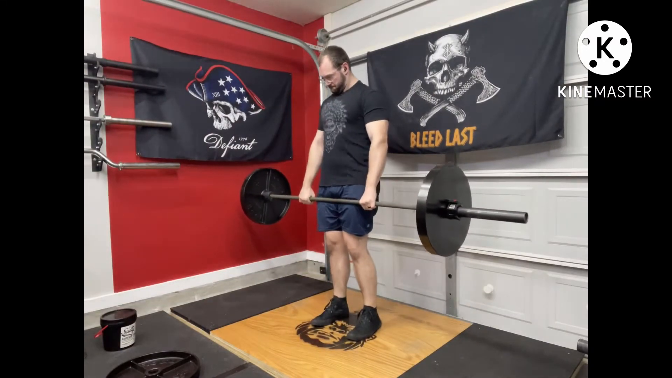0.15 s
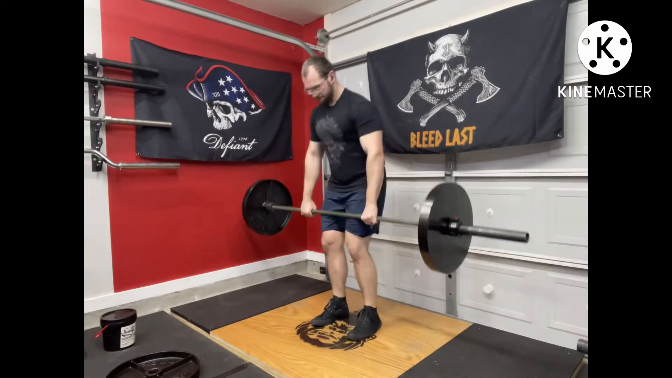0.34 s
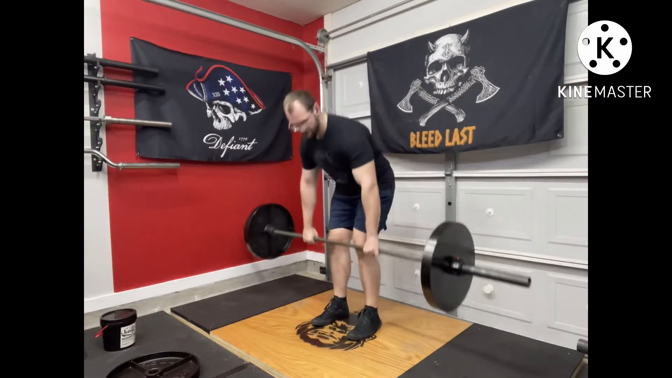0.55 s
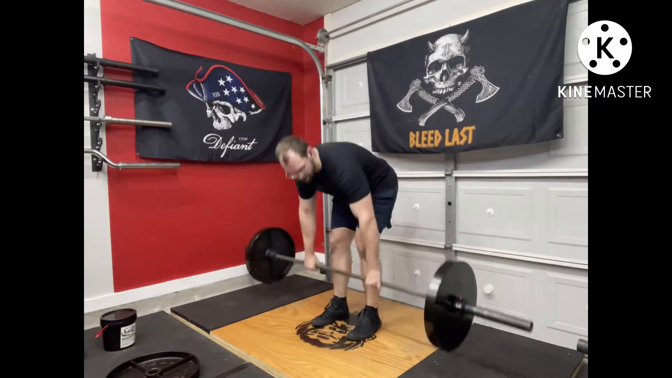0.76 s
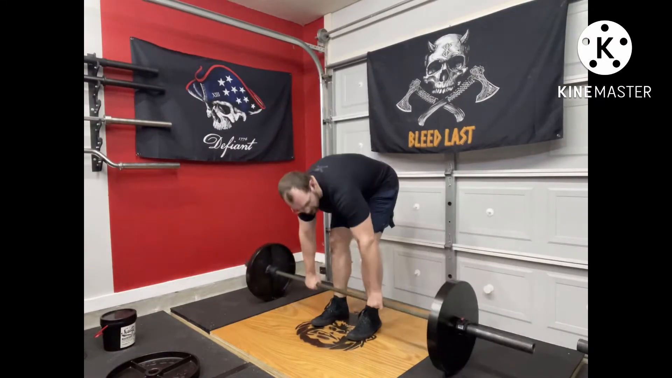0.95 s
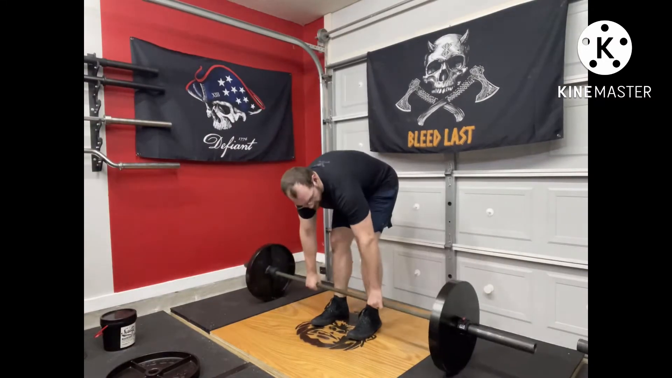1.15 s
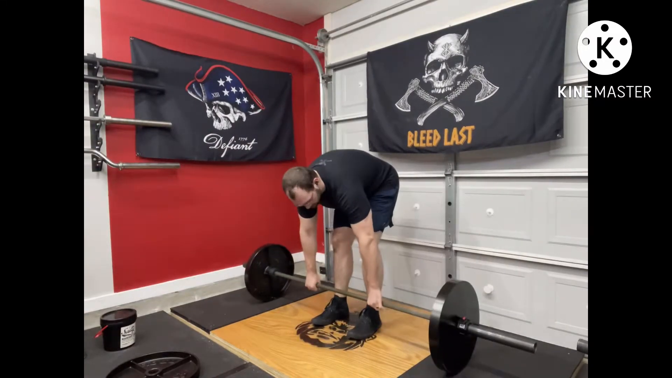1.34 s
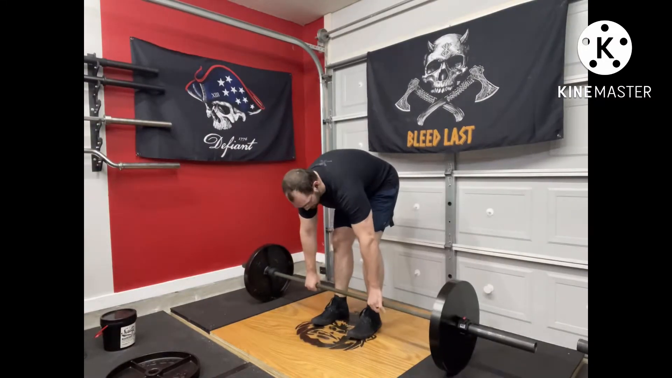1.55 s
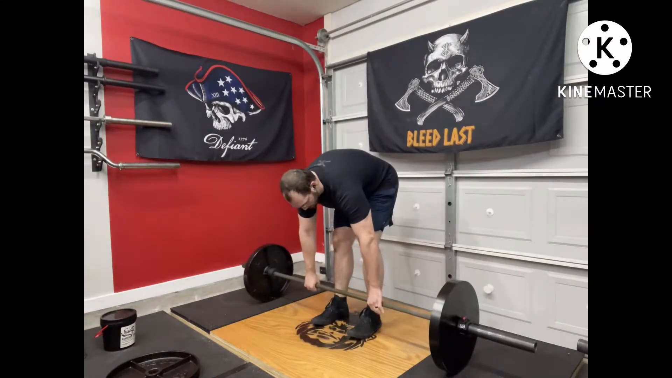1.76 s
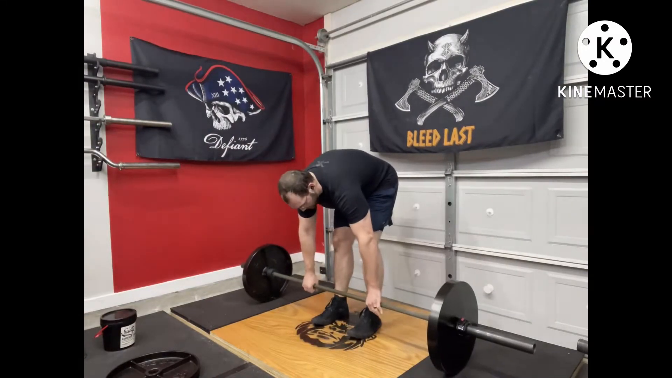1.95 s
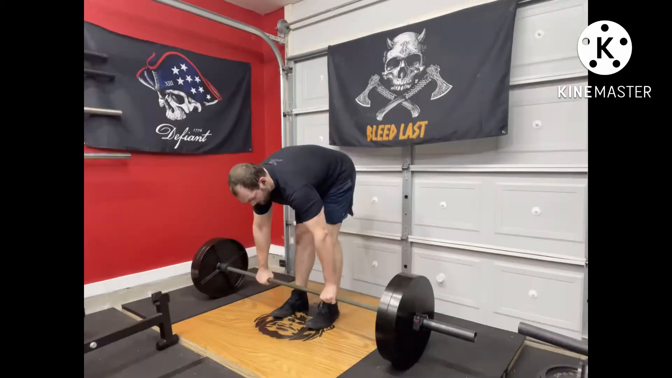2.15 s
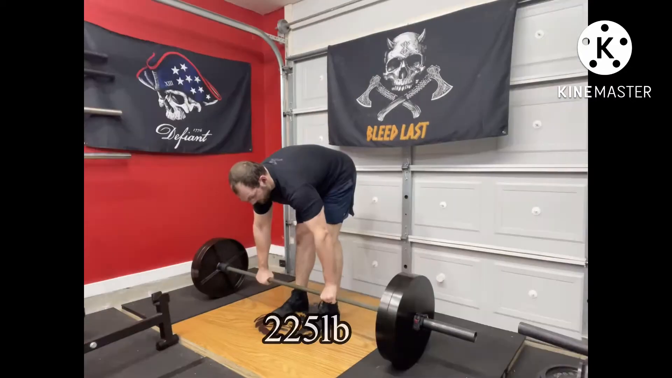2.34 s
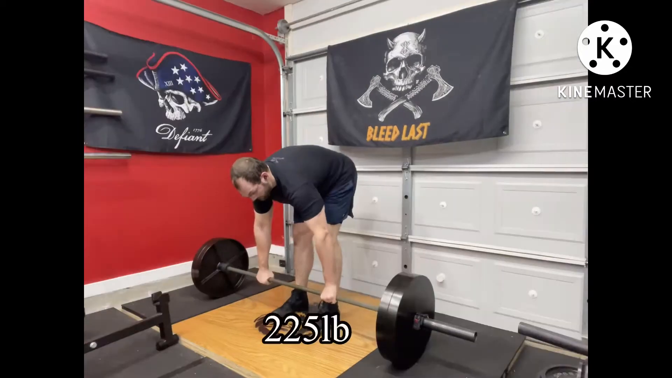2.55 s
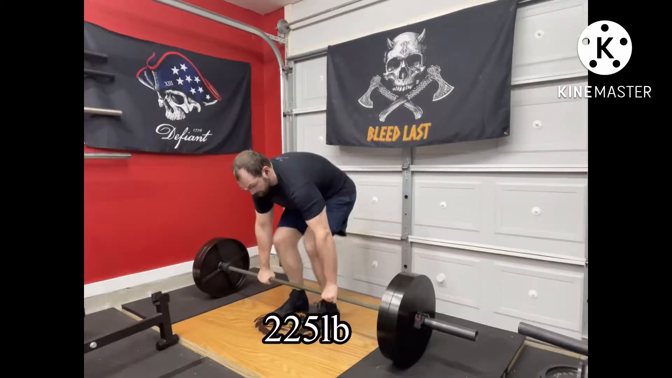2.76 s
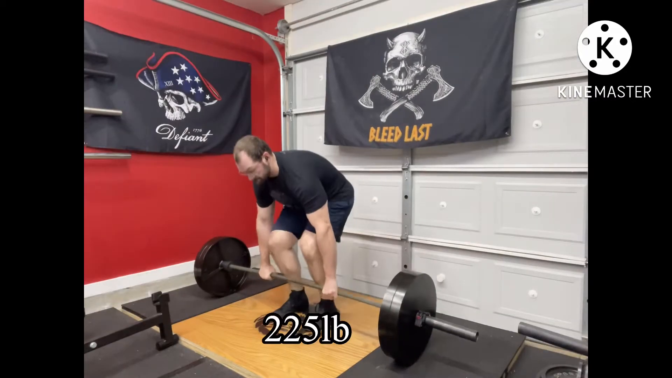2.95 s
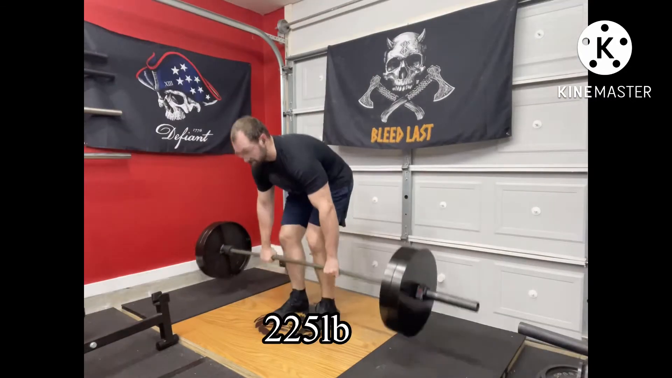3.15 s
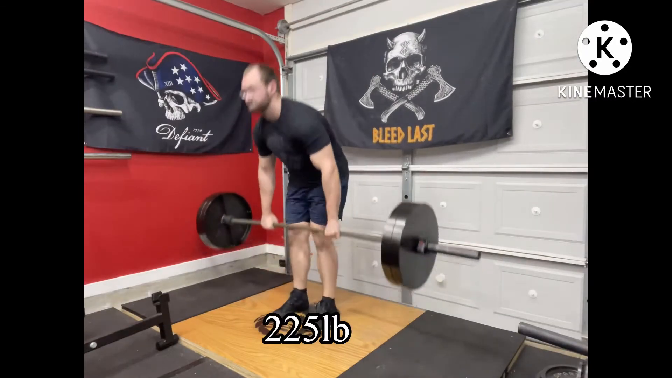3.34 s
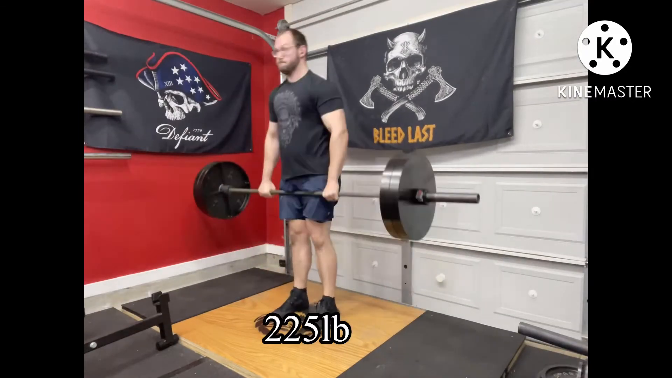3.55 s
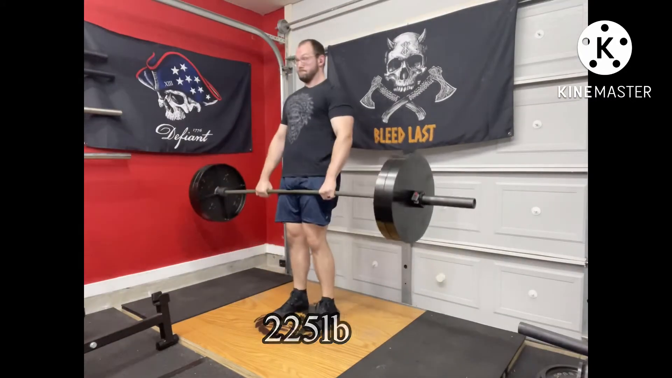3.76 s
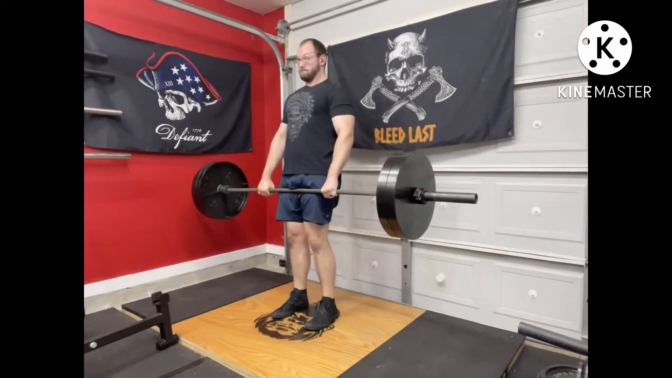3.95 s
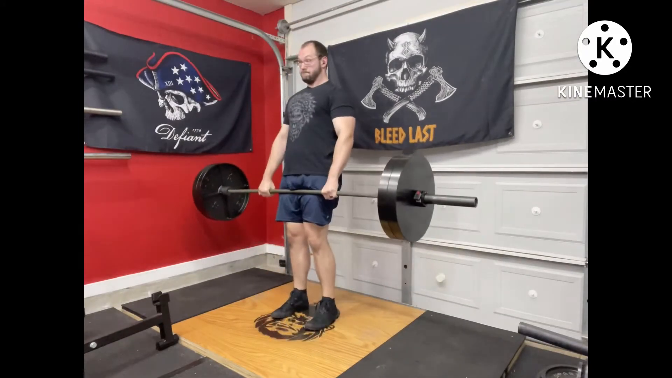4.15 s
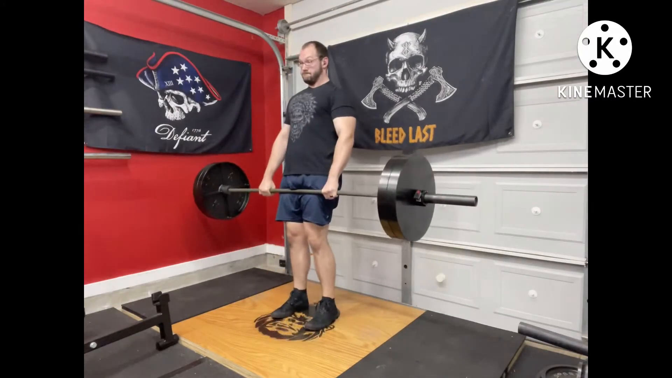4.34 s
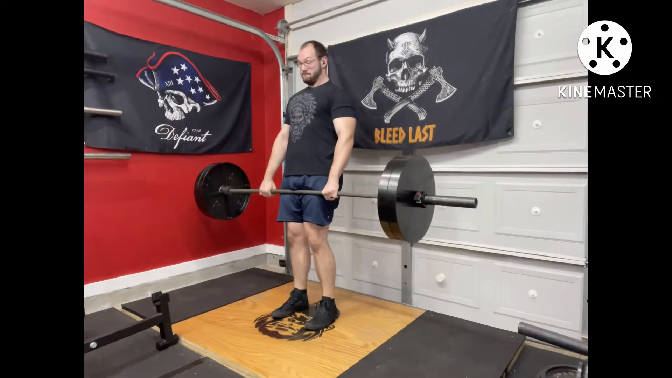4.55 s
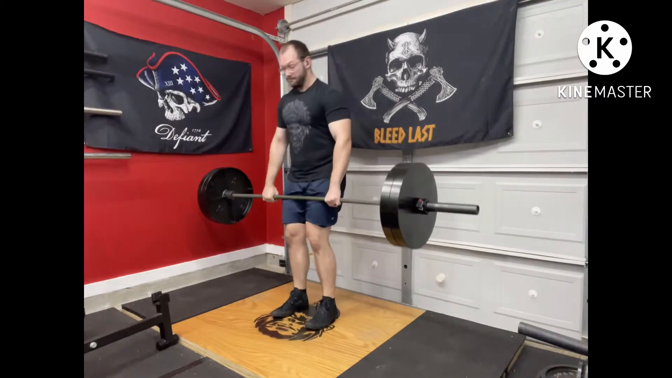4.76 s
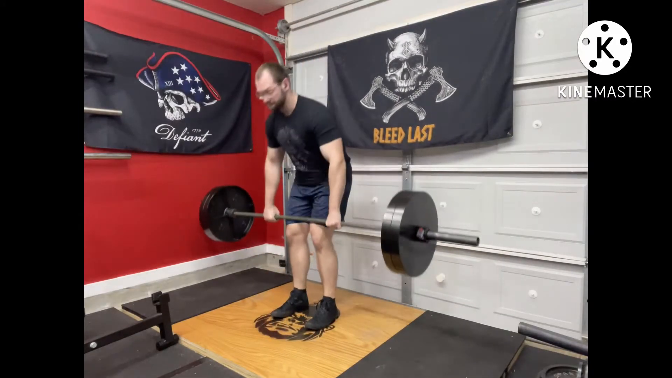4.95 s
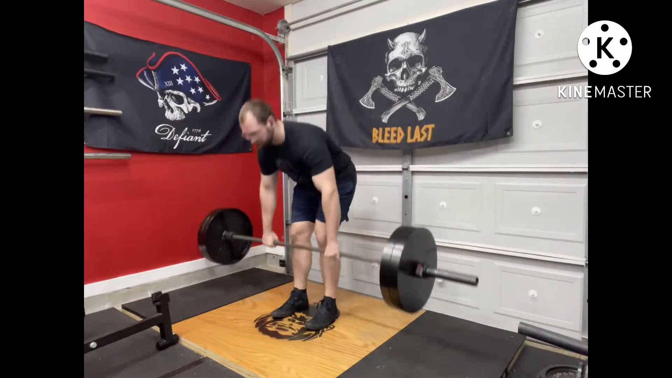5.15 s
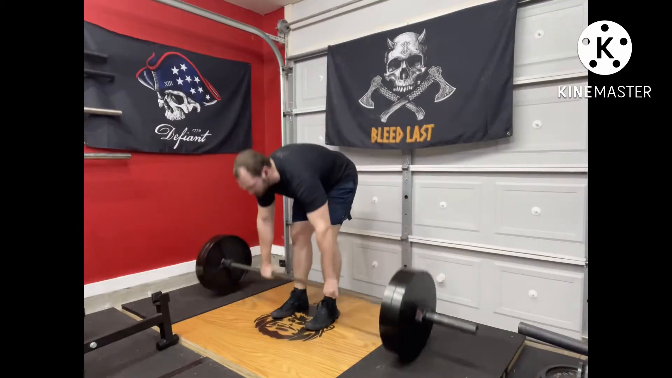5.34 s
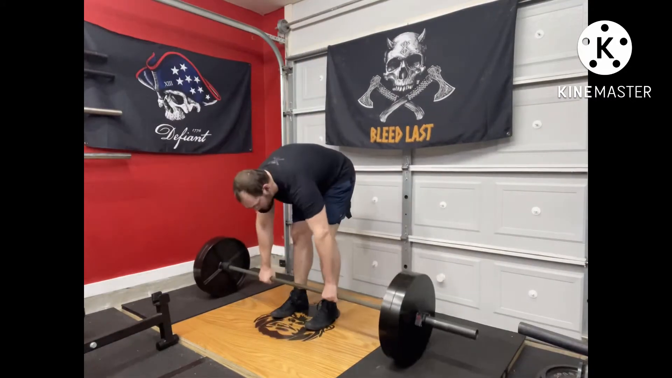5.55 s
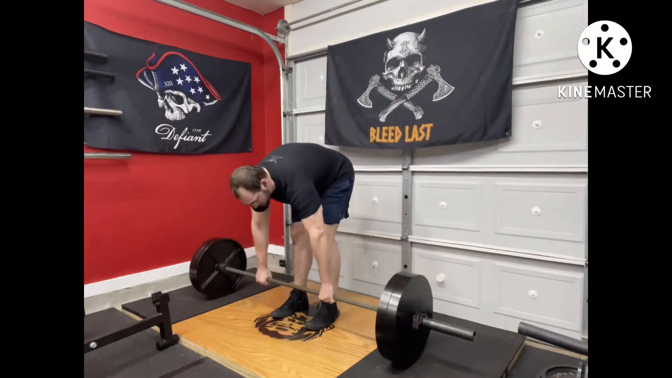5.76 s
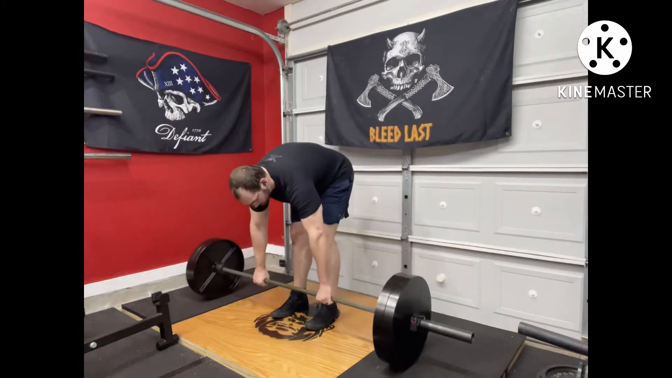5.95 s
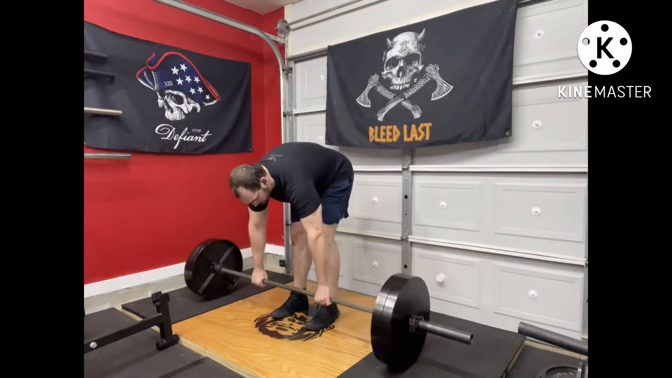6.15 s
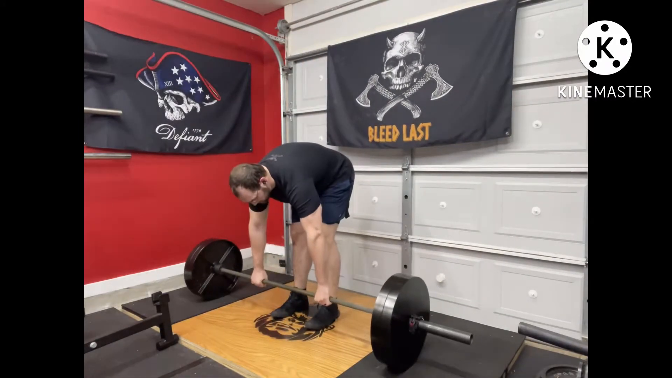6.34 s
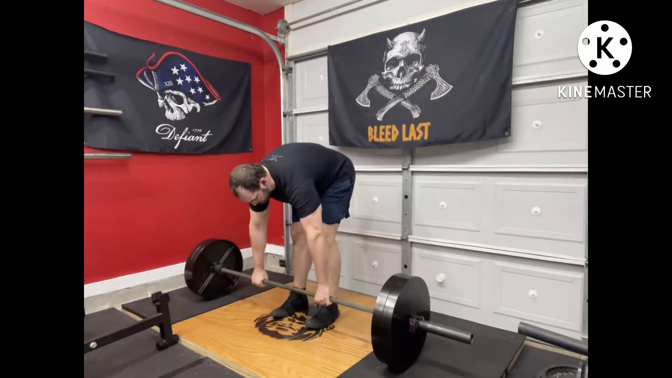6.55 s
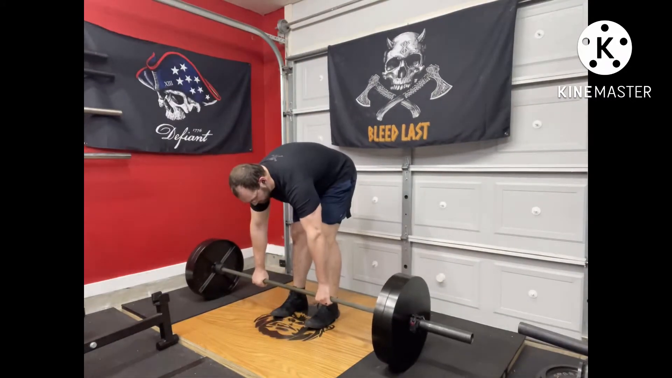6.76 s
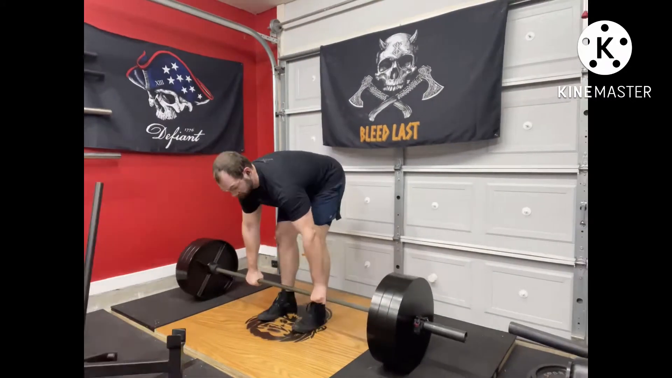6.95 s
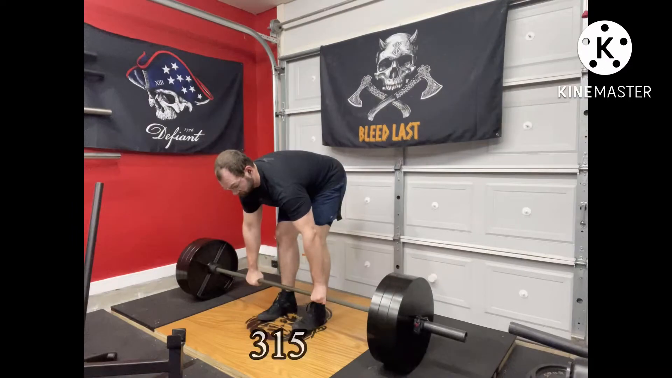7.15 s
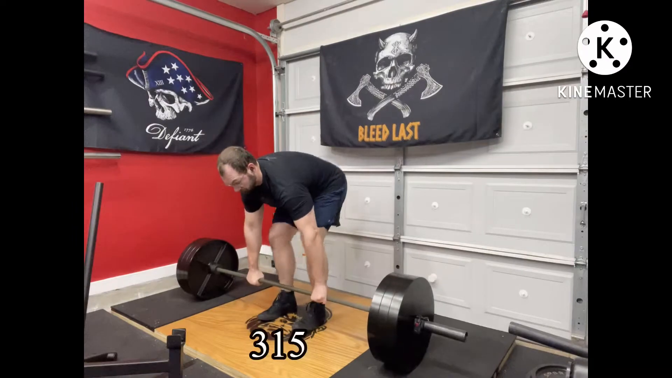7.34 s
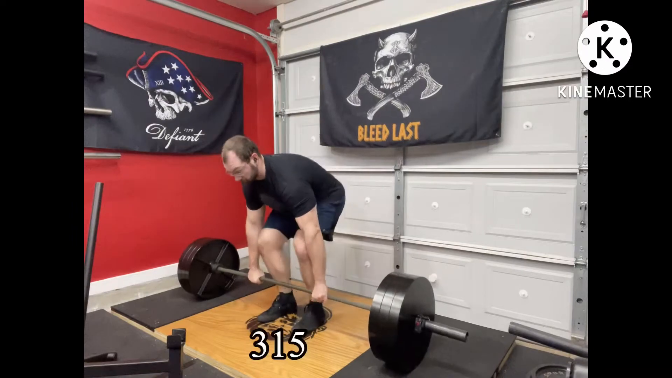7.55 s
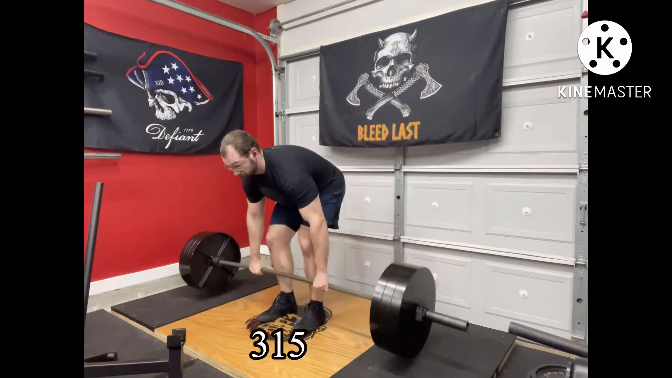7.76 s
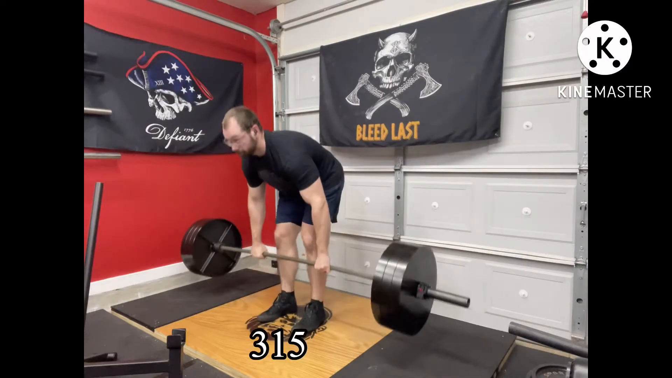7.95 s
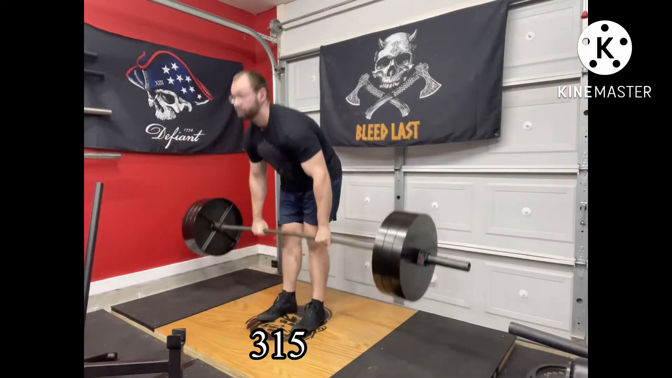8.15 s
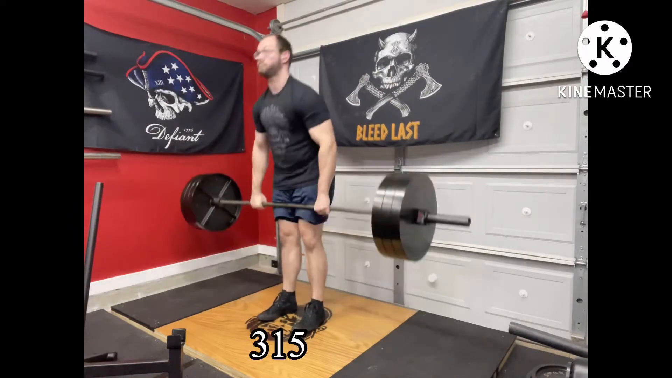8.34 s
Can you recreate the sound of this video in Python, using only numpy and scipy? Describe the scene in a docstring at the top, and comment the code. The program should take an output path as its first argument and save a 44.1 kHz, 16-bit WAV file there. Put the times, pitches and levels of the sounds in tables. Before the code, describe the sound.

In a hard-walled garage, a fan hums while a loaded barbell slams down with rattling iron clangs, then clanks through two more pulls.

```python
"""A fan rushes and hums; then a loaded barbell lands in a garage gym, and its iron plates clang and rattle on.
Later the plates clank against the sleeves as the bar is pulled off the platform or jerks to a stop.
The three shots are joined by fades. Each contact is a burst of random taps plus decaying iron tones.
The fan is shaped noise, a wavering drone and a hum; the hard walls answer with decaying noise,
and the microphone rounds off the loudest blows."""
import sys
import numpy as np
from scipy import signal
from scipy.fft import rfft, irfft, next_fast_len
from scipy.io import wavfile
from scipy.ndimage import uniform_filter1d

SR = 44100
rng = np.random.default_rng(int(sys.argv[2]) if len(sys.argv) > 2 else 0)


def generate_wav(sig):
    """Save sig (samples, or channels by samples) to the path in sys.argv[1] as 16-bit PCM at SR."""
    pcm = np.round(np.clip(np.atleast_2d(sig).T, -1, 1) * 32767).astype(np.int16)
    wavfile.write(sys.argv[1], SR, pcm)


N = 374850  # length in samples
STEP = 20  # samples between envelope points

# moments where one shot fades into the next: [time_s]
SHOT_CUTS_S = [2.155, 6.95]
# the bar lands; the rims touch just before, and the gain on the fan sound is lower after:
# [start_s, level_db, touch_lead_s, touch_level_db, thud_db, gain_drop_db]
BAR_LANDINGS = [(.935, -1.5, .009, -22, -17.5, 6), (5.408, -2, .005, -8, 4, 11)]


def amp(db):
    """Gain of a level in dB."""
    return 10 ** (np.asarray(db) / 20)


def unit(x):
    """x scaled to an average strength (rms) of 1."""
    return x / np.sqrt(np.mean(x ** 2) + 1e-20)


def along(points, hz):
    """Read a curve of (pitch_hz, value) points, with pitch on a log axis."""
    point_hz, values = np.transpose(points)
    return np.interp(np.log(hz + 1), np.log(point_hz + 1), values)


def filtered(x, response):
    """Change the strength and phase of each frequency of x by the given response."""
    size = next_fast_len(N + 2 * SR)
    spectrum = rfft(x, size) * response(np.fft.rfftfreq(size, 1 / SR))
    return irfft(spectrum, size)[..., :N]


def resonances(rows):
    """Response of resonances (pitch_hz, width_hz, peak_db) added with alternate signs."""
    def response(hz):
        total = 0
        for k, (center, width, db) in enumerate(rows):
            damping = 1j * hz * width
            total = total + (-1) ** k * amp(db) * damping / (center * center - hz * hz + damping)
        return total
    return response


def fan_gain():
    """Gain on the fan sound: constant in each shot until a landing, then lowered until the cut."""
    # gain in each shot before any landing: [level_db]
    shot_levels = [-33, -32, -33]
    drop_s, dip_s, dip_db = .4, .32, 5  # time of the lasting drop in gain; time and depth of a brief one
    t = np.arange(N) / SR
    shot = np.searchsorted(SHOT_CUTS_S, t)
    gain_db = np.array(shot_levels, float)[shot]
    for start, *_, gain_drop_db in BAR_LANDINGS:
        same_shot = shot == np.searchsorted(SHOT_CUTS_S, start)
        after = np.maximum(t - start, 0) * same_shot
        u = (after / dip_s) ** 2
        gain_db -= gain_drop_db * (1 - np.exp(-(after / drop_s) ** 2))
        gain_db -= dip_db * u * np.exp(1 - u)
    return amp(gain_db)


def fan(patchy_db):
    """Rushing air is noise with patches of random gain; a wavering drone and a steady mains hum join it."""
    # tone color of the rushing air, before its overall level is set: [pitch_hz, level_db]
    air_color = [(18, -55), (30, -52), (48, -15), (120, -11.5), (188, -7), (238, -5), (278, -7.5),
                 (446, -10), (595, -8), (679, -10), (1030, -7.5), (2270, -15.5), (4250, -22), (14600, -47),
                 (15800, -42)]
    # resonance that turns noise into the drone, applied twice: [pitch_hz, width_hz, peak_db]
    drone_modes = [(239.2, 16, 0)]
    noise = signal.stft(rng.standard_normal(N), nperseg=512)[2]
    patches = uniform_filter1d(rng.standard_normal(noise.shape), 6, 0)  # smooth over pitch
    patches = uniform_filter1d(patches, 14, 1)  # smooth over time
    air = signal.istft(noise * amp(patchy_db * unit(patches)), nperseg=512)[1][:N]
    rush = unit(filtered(air, lambda hz: amp(along(air_color, hz))))
    wavering = filtered(rng.standard_normal(N), lambda hz: resonances(drone_modes)(hz) ** 2)
    drone = amp(-10) * unit(wavering)
    hum = amp(-10) * np.sin(2 * np.pi * 60 * np.arange(N) / SR)
    return (rush + drone + hum) * fan_gain()


def bursts():
    """List every contact: (start_s, level_db, rise_s, t60_s, hardness_hz, plate_db, bar_db, thud_db)."""
    # t60_s is the time to fade by 60 dB; ring and thud levels are relative to the contact
    # plates bounce and rock after a landing: [start_s, level_db, t60_s, plate_ring_db]
    rattles = [(.975, -9.5, .06, 12.5), (1.001, -17, .14, 3), (1.09, -23, .16, 7.5), (1.149, -25.5, .3, 6),
               (1.26, -24.5, .38, 11), (1.34, -29.5, .33, 8), (5.444, -9, .1, -6), (5.53, -22, .55, 3.5),
               (5.72, -23.5, .45, 5), (5.83, -23.5, .14, 4)]
    # plates clank as the bar is pulled up or jerks to a stop:
    # [start_s, level_db, rise_s, t60_s, hardness_hz, plate_ring_db, bar_ring_db]
    clanks = [(2.931, -16.5, .0012, .14, 6000, .6, -5.5), (2.955, -9, .021, .19, 2450, 9, 10.5),
              (2.982, -11, .0074, .45, 2550, -1.5, -5), (3.018, -15, .0035, .29, 3200, 7, 9),
              (3.515, -19, .0005, .076, 2600, 4, -12), (3.574, -15.5, .0114, .12, 1500, 7, -1.5),
              (3.597, -17, .013, .25, 2430, 4.5, 3.5), (3.99, -20, .0088, .26, 1500, 3.5, .6),
              (7.56, -33, .0089, .134, 2100, 1.1, 3), (7.598, -18, .0061, .1, 1500, 6, 1.1),
              (7.612, -3.5, .004, .13, 3500, -.6, .3), (7.655, -9, .0017, .25, 3000, -15, 1.5),
              (7.76, -17, .025, .24, 3040, -12, -2.1)]
    # a sleeve ticks on the bar: [start_s, level_db]
    ticks = [(3.34, -48), (3.62, -26), (4.005, -40), (8.095, -43)]
    # the rims touch: [rise_s, t60_s, hardness_hz, plate_ring_db, bar_ring_db]
    touch = (.0007, .011, 2000, -10.5, -18)
    # the full landing: [rise_s, t60_s, hardness_hz, plate_ring_db, bar_ring_db]
    slam = (.0006, .065, 15000, 3, -17)
    # every sleeve tick: [rise_s, t60_s, hardness_hz, plate_ring_db, bar_ring_db, thud_db]
    tick = (.002, .05, 9000, -2.1, 9, -40)
    usual_db, first_hard_hz, usual_thud_db, rattle_bar_db = -22, 15000, -29, -13  # a usual rattle
    usual_rise_s, usual_t60_s = .04, .4
    heavier = 1.5  # dB of thud for each dB of a stronger rattle
    softens_s = .27  # a rattle's hardness is halved this long after the landing
    rows = []
    for start, level, lead, touch_db, thud_db, _ in BAR_LANDINGS:
        rows.append((start - lead, touch_db, *touch, thud_db + 11))
        rows.append((start, level, *slam, thud_db))
    for start, level, t60, plate_db in rattles:
        since = min(start - row[0] for row in BAR_LANDINGS if row[0] < start)
        rise = usual_rise_s * (t60 / usual_t60_s) ** 1.5
        hard_hz = first_hard_hz / (1 + since / softens_s)
        thud_db = usual_thud_db + heavier * (level - usual_db)
        rows.append((start, level, rise, t60, hard_hz, plate_db, rattle_bar_db, thud_db))
    rows += [(*clank, -29) for clank in clanks]  # -29 is the thud in dB
    return rows + [(start, level, *tick) for start, level in ticks]


def softness(hz, hard_hz):
    """A softer contact lacks treble: the share of each pitch that a contact of the given hardness passes on."""
    return 1 / (1 + (hz / hard_hz) ** 2)


def blows(per_s):
    """Each burst is a hail of taps that crack in the air and shake the platform."""
    # tone color of the bare contact, raised as a whole below: [pitch_hz, level_db]
    crack_color = [(80, -54), (150, -13.5), (400, -5.5), (900, -.3), (1300, 6), (2000, 1.5), (3100, 5),
                   (7000, 1.5), (8500, -4.5), (12000, -3), (15500, -9.5)]
    # platform resonances, raised as a whole below: [pitch_hz, width_hz, peak_db]
    platform_modes = [(75, 50, -1.5), (122, 71, -4), (297, 160, -9)]
    crack, floor = np.zeros(N + SR), np.zeros(N + SR)
    t = np.arange(SR // 2) / SR
    hz = np.fft.rfftfreq(len(t), 1 / SR)
    for start, level, rise, t60, hard_hz, _, _, thud_db in bursts():
        happens = rng.random(len(t)) < per_s / SR
        taps = rng.standard_normal(len(t)) * happens * np.sqrt(SR / per_s)
        taps *= amp(level - 60 * t / t60) * (1 - np.exp(-t / rise))
        force = irfft(rfft(taps) * softness(hz, hard_hz), len(t))
        first = round(start * SR)
        crack[first:][:len(t)] += force
        floor[first:][:len(t)] += amp(thud_db) * force
    crack_sound = filtered(crack[:N], lambda hz: amp(along(crack_color, hz) + 5.5))
    thud = filtered(floor[:N], resonances(platform_modes)) * amp(18)
    return crack_sound + thud


def strengths(rate, size):
    """Force of every burst over time, one row each: a quick rise and a steady fade in dB."""
    start, level, rise, t60 = np.transpose(bursts())[:4, :, None]
    t = np.maximum(np.arange(size) / rate - start, 0)
    return amp(level - 60 * t / t60) * (1 - np.exp(-t / rise))


def ring(pitches, modes, drive_db, hard_hz, scatter_db, rough, flutter_hz, widen_hz=2200):
    """Each mode stores energy fed by the bursts and loses it at its own speed; contacts make it flutter."""
    rate, size = SR / STEP, N // STEP + 2
    power = strengths(rate, size) ** 2
    at, out = np.arange(size) * STEP, np.zeros(N)
    for hz, (db, t60) in zip(pitches, modes):
        scatter = scatter_db * rng.standard_normal(len(power))
        share = amp(db + drive_db + scatter) * softness(hz, hard_hz)
        keep = amp(-120 / (t60 * rate))  # part of the energy left after one envelope point
        stored = signal.lfilter([1], [1, -keep], share ** 2 @ power)
        # slow noise sways size and phase, faster for high modes
        smooth = np.exp(-2 * np.pi * flutter_hz * np.hypot(1, hz / widen_hz) / rate)
        noise = rng.standard_normal((2, size))
        a, b = unit(signal.lfilter([1], [1, -2 * smooth, smooth ** 2], noise))
        swing = np.sqrt(stored) * np.hypot(1 + rough * a, rough * b)
        phase = np.unwrap(np.arctan2(rough * b, 1 + rough * a)) + rng.uniform(0, 2 * np.pi)
        t = np.flatnonzero(np.repeat(stored > 1e-9, STEP)[:N])  # skip samples too faint to matter
        out[t] += np.interp(t, at, swing) * np.cos(2 * np.pi * hz / SR * t + np.interp(t, at, phase))
    return out


def iron():
    """Plates, bar and sleeves ring; steel on steel in the sleeves is always hard."""
    # mode pitches of one plate a side, plates stacked, the steel bar and its loose sleeves: [pitch_hz]
    lone_pitches, stack_pitches = [894, 1311, 1701, 2129, 2146, 2593, 2807, 3050, 3424, 3736, 3978, 1326,
                                   4554, 4732, 4783, 4899, 5103, 5739, 6185, 6506, 6662, 7590, 8056, 8535,
                                   9082, 10115, 10153, 12301, 12675, 13340], [886, 7040, 1750, 1326, 1717, 2125, 2159, 2318, 2425,
                                                    2600, 2812, 2850, 3440, 3575, 6270, 3990, 7300, 4113,
                                                    4412, 4708, 4780, 5106, 5338, 5685, 5782, 6065, 6387,
                                                    8000, 6480, 6904]
    bar_pitches, sleeve_pitches = [156, 232, 310, 405, 499, 657, 927], [8280, 9400, 9770, 10870, 11150, 13640, 14500]
    # relative strength and fading time of those modes, in the same order: [level_db, t60_s]
    lone_modes, stack_modes = [(-23, .8), (-5.5, 0.76), (-2.5, 0.7), (-9, 1.1), (-8, 1.5), (-11.5, 0.59),
                               (-5.5, 0.56), (2.5, 0.25), (-10.5, 0.54), (-22, 0.48), (-6, 0.34),
                               (-1.5, 0.8), (-14, 0.51), (-10, 0.57), (-11.5, 0.56), (-5.5, 0.6),
                               (-7, 0.61), (-15, 0.49), (-10, 0.55), (-18.5, 0.35), (-8.5, 0.47),
                               (-5.5, 0.46), (-15, 0.45), (-18, 0.45), (-13, 0.39), (-9, 0.45), (-12, 0.45),
                               (-10, 0.35), (-13, 0.35), (-13, 0.33)], [(-10.5, 0.6), (-14.5, 0.33), (-2.5, 0.51), (-1.5, 0.45),
                                             (-3.5, 0.51), (-10.5, 0.76), (-7.5, 0.56), (-5, 0.51),
                                             (-9, 0.7), (-8, 0.55), (-6.5, 0.55), (-4, 0.39), (-7, 0.4),
                                             (-7, 0.41), (-27, 0.61), (-12.5, 0.66), (-20.5, 0.52),
                                             (-13, 0.52), (-12.5, 0.6), (-13, 0.42), (-18.5, 0.5),
                                             (-11.5, 0.5), (-21, 0.49), (-14, 0.49), (-10, 0.49),
                                             (-14, 0.55), (-23, 0.48), (-14, 0.39), (-16.5, 0.42),
                                             (-19, 0.7)]
    bar_modes, sleeve_modes = [(-4.5, 0.39), (-3.5, 0.42), (-8.5, 0.57), (-7.5, 0.63), (-5.5, 0.38),
                               (-6.5, 0.33), (-3.5, 0.13)], [(-11, 0.41), (-18.5, .3), (-2.5, 0.7), (-10.5, 0.52),
                                            (-17.5, 0.44), (-3, 0.39), (-5, 0.13)]
    more_plates_s, silent_db = 2.15, -200  # from this time on the plates are stacked
    start, _, _, _, hard_hz, plate_db, bar_db, _ = np.transpose(bursts())
    light = start < more_plates_s
    lone_db = np.where(light, plate_db, silent_db)
    stack_db = np.where(light, silent_db, plate_db)
    # stacked plates answer each contact as if it were 1.65 times harder
    lone = ring(lone_pitches, lone_modes, lone_db - 25.0, hard_hz,
                scatter_db=1.8, rough=0.5, flutter_hz=14)
    stack = ring(stack_pitches, stack_modes, stack_db - 25, 1.65 * hard_hz,
                 scatter_db=2.5, rough=0.85, flutter_hz=19)
    bar = ring(bar_pitches, bar_modes, bar_db - 30, hard_hz,
               scatter_db=2.5, rough=1.48, flutter_hz=18.7)
    sleeves = ring(sleeve_pitches, sleeve_modes, bar_db - 44.5, np.inf,
                   scatter_db=2, rough=1.44, flutter_hz=50)
    return lone + stack + bar + sleeves


def garage(x, wet_db):
    """Each frequency of the walls' answer dies at its own speed; every short stretch excites another tail."""
    # how long the walls' answer takes to fade by 60 dB: [pitch_hz, t60_s]
    wall_fading = [(100, 0.35), (500, 0.93), (2000, 0.87), (6000, 0.93), (14000, 0.38)]
    out, stretch = np.zeros(N + 2 * SR), SR // 4
    for i in range(0, N, stretch):
        hz, t, noise = signal.stft(rng.standard_normal(SR), SR, nperseg=256)
        fading = amp(-60 * t / along(wall_fading, hz)[:, None])
        tail = signal.istft(noise * fading, SR, nperseg=256)[1]
        wet = signal.fftconvolve(x[i:i + stretch], tail / np.linalg.norm(tail))
        out[i + 200:][:len(wet)] += wet  # the answer starts 200 samples late
    return amp(wet_db) * out[:N]


def fades(gap, length):
    """Gain that closes towards each cut and opens after it; gap and length are in seconds."""
    t = np.arange(N) / SR
    away = np.min(np.abs(t - np.array(SHOT_CUTS_S)[:, None]), axis=0)
    return np.clip((away - gap) / length, 0, 1) ** 0.99


def scene():
    """Add the fan, the barbell and its echo, then fade around the cuts."""
    background = fan(patchy_db=0.7)
    hits, rings = blows(per_s=2500), iron()
    echo = garage(hits + amp(-5.5) * rings, wet_db=-3)
    sound = hits + rings + echo + background
    return (sound * fades(gap=0.018, length=0.15))[None]


def record(dry):
    """The microphone lacks deep bass, overloads near full scale and keeps nothing above its band limit."""
    bass_hz, limit, top_hz = 38, .93, 15900
    x = filtered(dry, lambda hz: (1j * hz / (bass_hz + 1j * hz)) ** 4)
    x = x / (1 + np.abs(x / limit) ** 8) ** (1 / 8)  # peaks are rounded off below the limit
    return filtered(x, lambda hz: hz < top_hz)


dry = scene()
out = record(dry)
generate_wav(out)
```